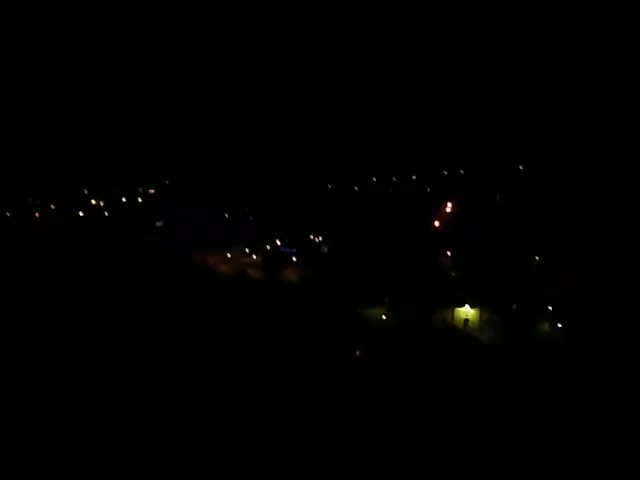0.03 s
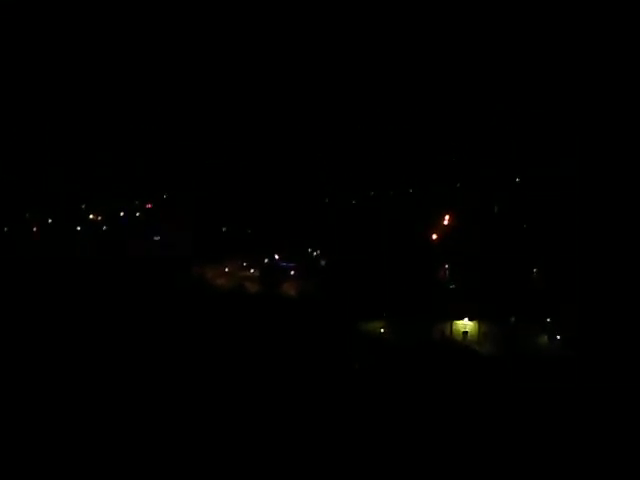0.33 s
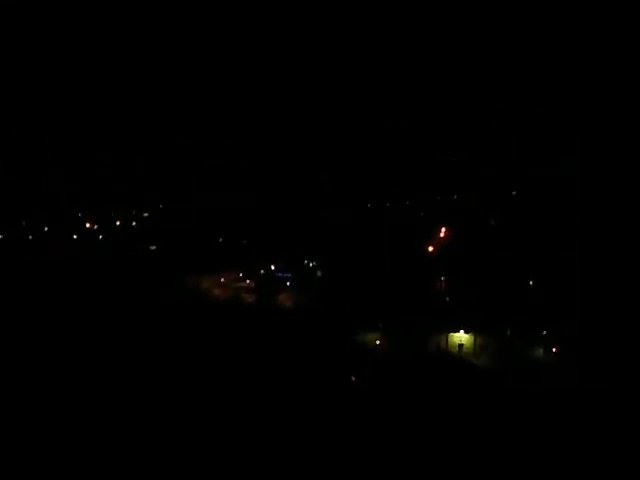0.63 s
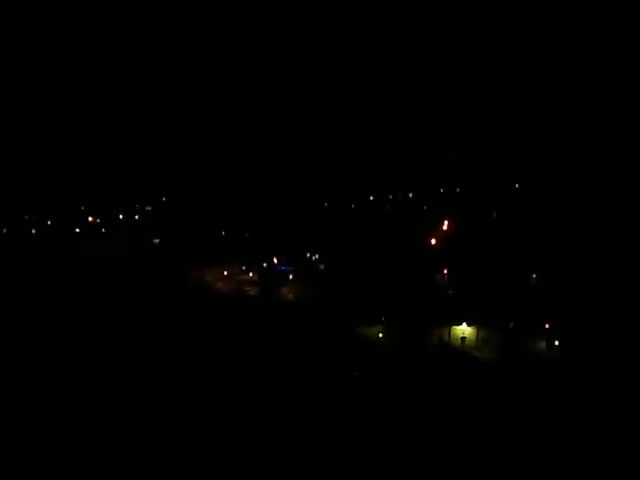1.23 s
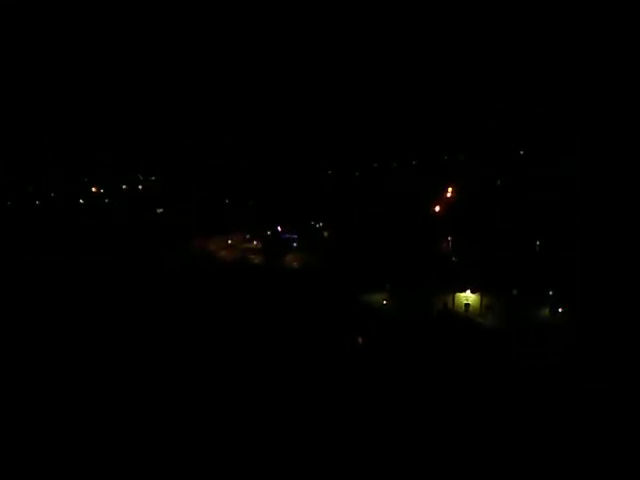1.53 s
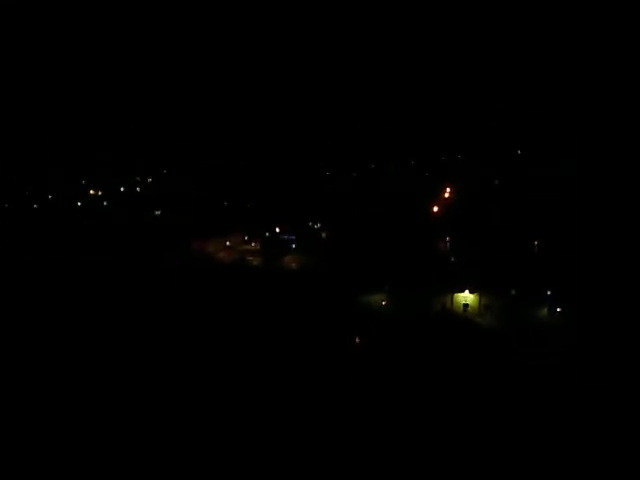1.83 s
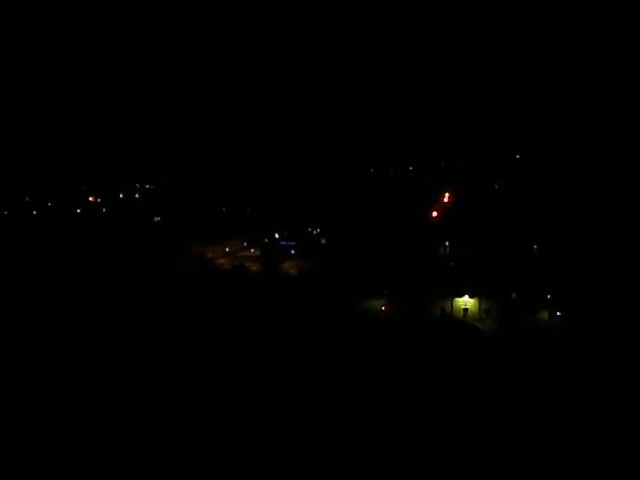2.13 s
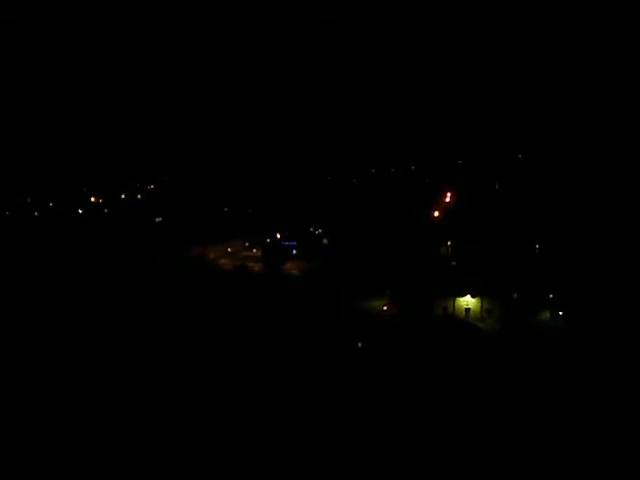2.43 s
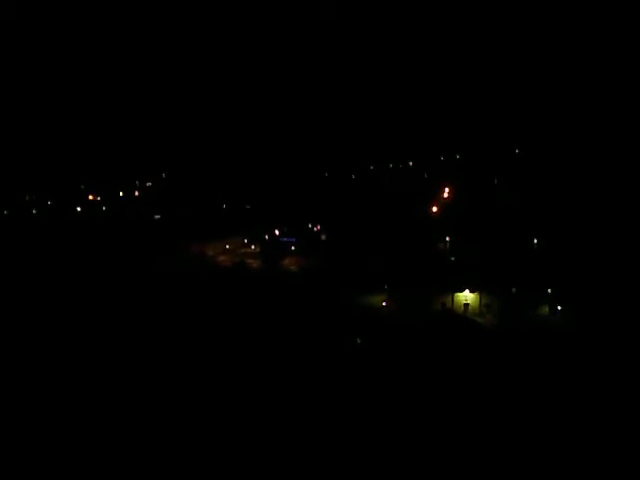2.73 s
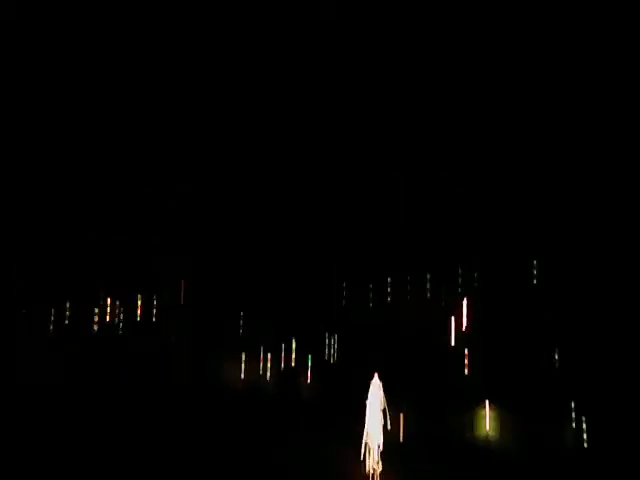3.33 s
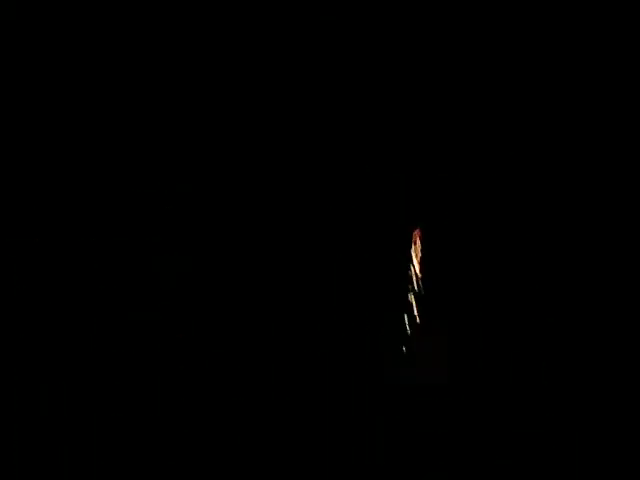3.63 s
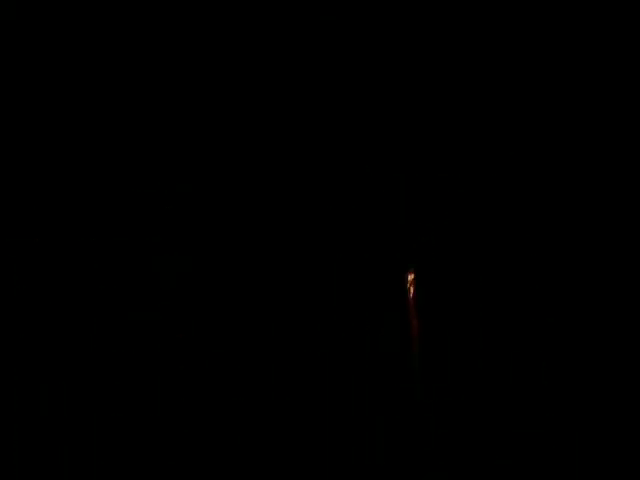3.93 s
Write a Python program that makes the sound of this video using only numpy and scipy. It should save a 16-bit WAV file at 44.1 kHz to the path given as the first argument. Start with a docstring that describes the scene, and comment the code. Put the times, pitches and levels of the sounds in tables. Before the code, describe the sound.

A small firework rocket launches close by, outdoors at night. Sharp handling clicks dot the first 0.7 seconds over faint air and a thin trill. The fuse fizzes softly around 1.4, 1.8 and 2.4 seconds. From 2.7 seconds a hiss swells, becoming a loud, slightly distorted roar from 3.1 to 3.5 seconds. It then drops and thins as the rocket climbs, with soft air puffs on the microphone.

```python
"""A small firework rocket lifts off close to a pocket camera on a quiet hillside at night.
Its turbulent gas jet hisses up through the motor's resonances, roars and overloads the microphone
for a third of a second; the hiss then thins with distance and stirred air puffs on the microphone.
Beforehand, handling clicks knock the camera's case and the fuse fizzes in soft spurts.
Faint night air, a drone, a trill, a hum and the camera's whine lie underneath."""
import sys
import numpy as np
from scipy import signal
from scipy.fft import rfft, irfft
from scipy.io import wavfile

SR = 44100
rng = np.random.default_rng(int(sys.argv[2]) if len(sys.argv) > 2 else 0)


def digitize_waveform(pressure):
    """Quantize a signal to 16-bit integers and store it at the path in sys.argv[1].

    Rows of a 2-D input are taken as channels; values are limited to [-1, 1].
    """
    field = np.atleast_2d(pressure).T
    bounded = np.clip(field, -1, 1)
    quanta = np.round(bounded * 32767).astype(np.int16)
    wavfile.write(sys.argv[1], SR, quanta)


N = 176400
LIFT_OFF_S = 3.524
MIC_TOP_HZ, MIC_ORDER = 5433, 14.6


def motor():
    """Jet noise: turbulent exhaust swells, gains a low roar at full flame and drops away at lift-off."""
    # Envelope of the jet's hiss at the microphone (time [s], level [dB])
    swell = [(2.71, -60), (2.77, -44.5), (2.85, -36.5), (2.94, -30), (3.03, -21.5), (3.09, -14.5),
             (3.125, -10), (3.2, -8), (3.28, -5), (3.335, -9), (3.385, -7), (3.46, -6.5), (3.525, -8.5)]
    # Spectrum of the hiss (frequency [Hz], relative level [dB])
    hiss_spectrum = [(100, -35), (500, -33.5), (1000, -21.5), (1600, -14), (2350, -12), (3100, -8),
                     (4000, -1), (4800, -5.5), (5500, -1.5), (7000, -18)]
    # Spectrum of the full flame's roar (frequency [Hz], relative level [dB])
    roar_spectrum = [(25, -6), (80, -6.5), (250, -5.5), (500, -7), (900, -4.5), (1600, -6.5), (2500, 3),
                     (3200, -2.5), (6000, -27)]
    roar_db, roar_from_s, roar_rise_s = -6, 3.13, 0.035
    sputter_db, leave_db_per_s = 0.76, 744
    t = seconds()
    tube = band(hz=2360, width_hz=350)  # the motor's lower resonance
    hiss = colour(gas(), hiss_spectrum) + undb(-0.5) * nozzle() + undb(-12.5) * tube
    flame = np.clip((t - roar_from_s) / roar_rise_s, 0, 1)
    roar = flame * undb(roar_db) * colour(gas(), roar_spectrum)
    leaving_db = leave_db_per_s * np.maximum(t - LIFT_OFF_S, 0)
    return (unit(hiss) + roar) * curve(swell) * undb(sputter_db * walk(210) - leaving_db)


def nozzle():
    """Resonance: gas rings in the nozzle, and the pitch rises as the pressure builds."""
    # Centre of the jet's main resonance (time [s], frequency [Hz])
    centre = [(2.749, 4410), (2.949, 4252), (3.05, 4441), (3.11, 4966), (3.2, 4704), (3.3, 4598),
              (3.52, 4666)]
    width_hz = 1010
    phase = 2 * np.pi * np.cumsum(np.interp(seconds(), *np.array(centre).T)) / SR
    ringing = walk(width_hz / 2) * np.cos(phase) + walk(width_hz / 2) * np.sin(phase)
    return unit(shape(ringing, mic_band))


def gas():
    """Combustion noise: a turbulent rush plus the shot noise of burning grains."""
    pops_per_s = 900
    pops = (rng.random(N) < pops_per_s / SR) * np.sign(noise())
    strength_db = np.minimum(rng.exponential(size=N), 5)
    return noise() + undb(-3) * unit(pops * undb(strength_db))


def flight():
    """Geometric spreading: the climbing rocket's hiss weakens as a power of its distance."""
    # Spectrum of the rocket in flight (frequency [Hz], relative level [dB])
    spectrum = [(100, -18), (400, -15), (800, -9), (1500, -5), (2400, -2), (3400, -2), (4400, 1),
                (5200, 0.5), (7000, -15)]
    level_db, onset_s, doubling_s, exponent = -22.5, 0.016, 0.025, 0.82
    age = seconds() - LIFT_OFF_S
    onset = np.clip(1 + age / onset_s, 0, 1)
    relative_distance = 1 + np.maximum(age, 0) / doubling_s
    return colour(gas(), spectrum) * onset / relative_distance ** exponent * undb(level_db + 1.3 * walk(22))


def wake():
    """Wind noise: stirred air rumbles, and each puff pushes the microphone once in and once out."""
    # Puffs of air on the microphone (time [s], peak level [dB], length [s])
    puffs = [(3.631, -48, 0.012), (3.695, -38, 0.016), (3.777, -49, 0.012), (3.831, -41, 0.009)]
    rumble_db, fade_s = -54, 0.45
    age = seconds() - LIFT_OFF_S
    out = undb(rumble_db) * walk(85) * (age > 0) * np.exp(-abs(age) / fade_s)
    for at, db, length in puffs:
        u = 4 * (seconds() - at) / length
        out -= undb(db) * u * np.exp((1 - u ** 2) / 2)  # slope of a Gaussian
    return out


def clicks():
    """Impact excitation: each handling click snaps and rattles over a dull knock of the case."""
    # Handling clicks (time [s], peak level [dB], low edge [Hz], high edge [Hz], relative rattle [dB])
    impacts = [(.0098, -28, 3140, 5500, -11), (0.0214, -23.5, 1100, 5540, -22),
               (0.0273, -18.5, 910, 2230, -26), (.132, -38, 3000, 5500, -22), (0.182, -39, 1280, 2980, -14),
               (.273, -31, 2500, 6000, -30), (.318, -20, 2140, 4900, -50), (0.3545, -32, 1500, 5000, -19),
               (.3601, -20, 1510, 4750, -28), (0.3644, -39.5, 250, 690, -23.5),
               (.3654, -32, 1700, 3300, -23), (.7083, -27, 1440, 6000, -34), (0.72, -23.5, 350, 1170, -35),
               (0.7227, -26.5, 1210, 4130, -14), (2.103, -36, 1700, 4010, -22)]
    snap_db, snap_s, rattle_s = -12.5, 0.00057, 0.005
    case_db, case_hz = -17.5, 564
    ticks_per_s, ticks_db = 20, -65
    out = np.zeros(N)
    offsets = np.arange(-400, 900)  # samples around the impact
    lag = offsets / SR
    for at, db, low_hz, high_hz, rattle_db in impacts:
        snap = undb(snap_db) * (lag > 0) * np.exp(-abs(lag) / snap_s)
        rattle = undb(rattle_db) * np.exp(-abs(lag) / rattle_s)
        force = (lag == 0) + (snap + rattle) * rng.standard_normal(len(lag))
        knock = undb(case_db) * passband(force, case_hz / 2, case_hz * 2)
        click = passband(force, low_hz, high_hz) + knock
        out[np.maximum(int(at * SR) + offsets, 0)] += undb(db) * click
    stray_ticks = (rng.random(N) < ticks_per_s / SR) * rng.uniform(-1.2, 1, N)
    return shape(out, mic_band) + undb(ticks_db) * unit(shape(stray_ticks, mic_band))


def fuse():
    """Unsteady combustion: the fuse fizzes in three soft spurts with Gaussian envelopes."""
    # Spurts of the fuse (time [s], Gaussian width [s], level [dB])
    spurts = [(1.4, 0.04, -49), (1.75, 0.092, -51), (2.436, 0.082, -54.5)]
    # Spectrum of the fizz (frequency [Hz], relative level [dB])
    spectrum = [(200, -18), (550, 1.5), (1200, -8), (2000, -3.5), (3000, -4.5), (4400, 2), (5500, -8),
                (7000, -14)]
    envelope = sum(undb(db) * np.exp(-((seconds() - at) / width) ** 2 / 2) for at, width, db in spurts)
    return envelope * colour(gas(), spectrum)


def night():
    """Superposition: broadband air, a narrowband drone and trill, and pure tones of whine and hum."""
    # Spectrum of the night air (frequency [Hz], relative level [dB])
    air_spectrum = [(25, 2), (60, 2.5), (130, 0), (250, 0), (450, -2.5), (900, 1.5), (1400, -2.5),
                    (2000, -2), (2700, -7.5), (3800, -8.5), (4600, -11), (5150, -10.5), (5550, -26),
                    (7000, -14)]
    # Low drone (frequency [Hz], bandwidth [Hz], level [dB], waver [dB])
    drone_bands = [(676, 100, -61, -1.9)]
    # Envelope of the thin high trill (time [s], level [dB])
    trill_levels = [(0, -59.5), (.45, -56.5), (.55, -51), (.74, -52), (.9, -56.5), (1.25, -58.5),
                    (1.4, -54.5), (1.62, -56), (1.88, -54), (2.12, -57.5), (2.42, -55.5), (2.65, -58)]
    # The camera's steady whine (frequency [Hz], level [dB])
    whine_tones = [(5356, -61), (5669, -68)]
    # Envelope of the hum (time [s], level [dB])
    hum_levels = [(0, -68.5), (.8, -63.5), (1.2, -64), (1.7, -73.5), (4, -66)]
    air = colour(gas(), air_spectrum) * undb(-55 + 0.5 * walk(2.2))
    drone = sum(band(hz, width) * undb(db + waver * walk(6)) for hz, width, db, waver in drone_bands)
    trill = band(hz=3473, width_hz=187) * curve(trill_levels)
    whine = sum(undb(db) * tone(hz) for hz, db in whine_tones)
    hum = tone(hz=295) * curve(hum_levels)
    return air + drone + trill + whine + hum


def undb(db):
    """Decibels to amplitude ratio."""
    return 10 ** (np.asarray(db) / 20)


def unit(x):
    """Normalisation to rms 1."""
    return x / np.sqrt(np.mean(x ** 2))


def seconds():
    """Time of every sample."""
    return np.arange(N) / SR


def curve(points):
    """Amplitude envelope through (time [s], level [dB]) points."""
    return undb(np.interp(seconds(), *np.array(points).T))


def shape(x, gain):
    """Zero-phase filtering by a gain that is a function of frequency."""
    return irfft(rfft(x, 2 * len(x)) * gain(np.linspace(1e-6, SR / 2, len(x) + 1)))[:len(x)]


def colour(x, points):
    """Spectral shaping by (frequency [Hz], level [dB]) points within the camera's band, at rms 1."""
    hz, db = np.array(points).T
    return unit(shape(x, lambda f: mic_band(f) * undb(np.interp(np.log(f), np.log(hz), db))))


def passband(x, low_hz, high_hz):
    """Causal band-pass filtering, scaled to peak 1."""
    y = signal.sosfilt(signal.butter(2, [low_hz, high_hz], "band", fs=SR, output="sos"), x)
    return y / abs(y).max()


def noise():
    """White Gaussian noise."""
    return rng.standard_normal(N)


def walk(cutoff_hz):
    """Random fluctuation: low-passed noise of rms 1."""
    return unit(shape(noise(), lambda f: 1 / (1 + (f / cutoff_hz) ** 4)))


def band(hz, width_hz):
    """Narrowband noise: one steep resonance under random excitation, at rms 1."""
    return unit(shape(noise(), lambda f: mic_band(f) / (1 + 2 * ((f - hz) / width_hz) ** 2)))


def tone(hz):
    """Simple harmonic motion at rms 1."""
    return np.sqrt(2) * np.sin(2 * np.pi * hz * seconds())


def mic_band(f):
    """Band limiting: two steep low-passes in cascade form the camera's narrow audio band."""
    first = 1 / np.sqrt(1 + (f / MIC_TOP_HZ) ** (2 * MIC_ORDER))
    return first / np.sqrt(1 + (f / (1.09 * MIC_TOP_HZ)) ** (4 * MIC_ORDER))


def overload(x):
    """Saturation: linear for small signals, then bending quickly into the ceiling."""
    linear_limit, ceiling = 0.53, 0.72
    headroom = ceiling - linear_limit
    clean = np.clip(x, -linear_limit, linear_limit)
    return clean + headroom * np.tanh((x - clean) / headroom)


def scene():
    """Linear superposition of all sources at one microphone."""
    return (motor() + flight() + wake() + clicks() + fuse() + night())[None]


def record(dry):
    """Nonlinear distortion: the input stage flattens peaks, adding rasp above its band; the top is cut."""
    rasp_db, rasp_span_hz, top_hz = -5.5, 6000, 15650
    baseline = 0.012 + undb(-46.5) * walk(4.3)  # the input stage rests off zero and drifts slowly
    oversampled = signal.resample_poly(dry, 4, 1, axis=1)  # limits aliasing
    clipped = signal.resample_poly(overload(oversampled), 1, 4, axis=1)
    softened = shape(clipped[0], lambda f: undb(rasp_db * np.clip((f - MIC_TOP_HZ) / rasp_span_hz, 0, 1)))
    low_pass = signal.ellip(8, 0.05, 60, top_hz, fs=SR, output="sos")
    return signal.sosfiltfilt(low_pass, softened + baseline)[None]


dry = scene()
out = record(dry)
digitize_waveform(out)
```